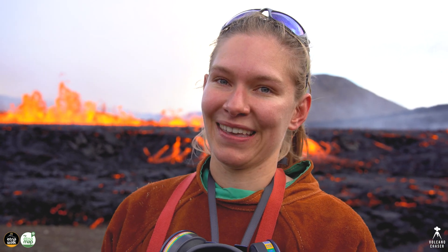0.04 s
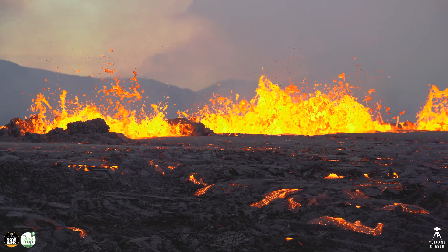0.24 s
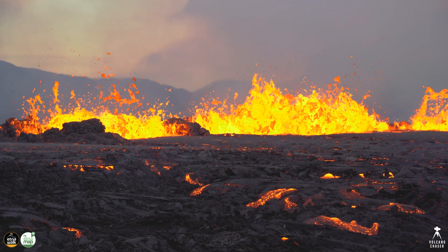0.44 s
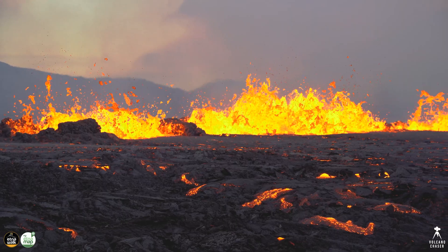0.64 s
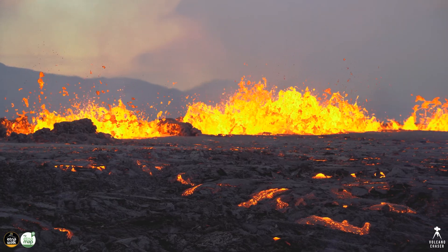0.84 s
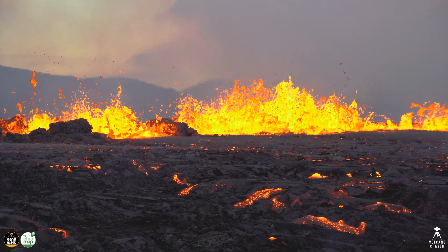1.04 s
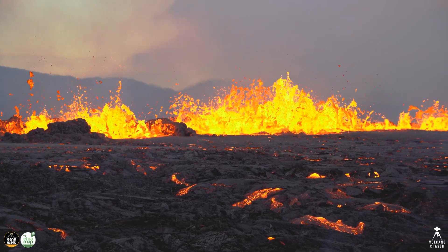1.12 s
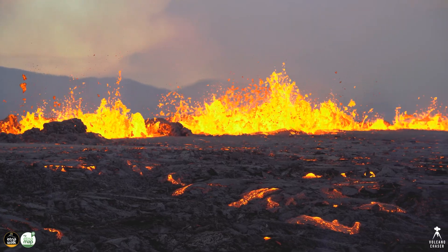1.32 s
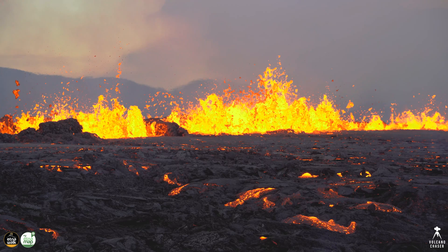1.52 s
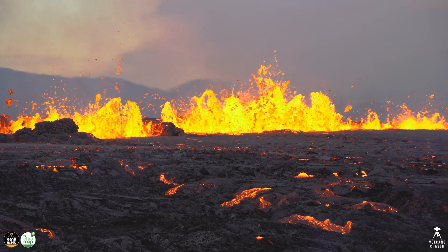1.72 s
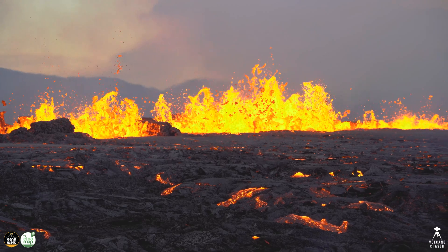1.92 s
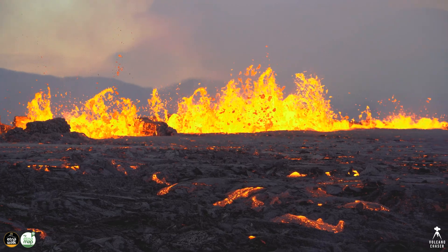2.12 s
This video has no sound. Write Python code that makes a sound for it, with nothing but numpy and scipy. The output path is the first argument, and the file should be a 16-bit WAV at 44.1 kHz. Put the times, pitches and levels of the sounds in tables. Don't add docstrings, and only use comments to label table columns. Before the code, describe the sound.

Lava fountains rumble continuously outdoors, deep gas bursts thudding through hissing spurts and small bubble pops; a wind gust and sharp crust ticks on the right open it, then light breeze brushes the stereo microphone.

```python
import sys
import numpy as np
from scipy import signal
from scipy.fft import rfft, irfft, next_fast_len
from scipy.io import wavfile
from scipy.ndimage import uniform_filter1d, map_coordinates

SR = 44100
rng = np.random.default_rng(int(sys.argv[2]) if len(sys.argv) > 2 else 0)


def makeup_ratio(level_db):
    decades = np.asarray(level_db, float) / 20
    return 10 ** decades


def unload_wav(signal):
    wavfile.write(
        sys.argv[1],
        SR,
        np.round(np.clip(np.atleast_2d(signal).T, -1, 1) * 32767).astype(np.int16),
    )


N = 95388

# time in seconds, level in dB.
ROAR_DB = [(0.0, -29), (0.08, -27.5), (0.38, -23), (0.74, -23), (0.86, -19.5), (1.05, -23.5), (1.24, -23),
           (1.4, -20), (1.67, -23.5), (1.83, -23.5), (2.16, -23)]
# frequency in Hz, density in dB per Hz.
ROAR_SPECTRUM = [(12, -45), (20, -5.5), (59, -3.5), (120, -0.5), (187, -7.5), (290, -21.5), (344, -24.5),
                 (464, -35.5), (600, -45.5), (780, -61), (1320, -120)]
# centre in seconds, pitch in Hz, level in dB, length in cycles.
SLUGS = [(0.099, 121, -19, 2.4), (0.215, 57, -15, 0.86), (0.319, 60, -14, 2.8), (.377, 125, -9.5, 3.1),
         (.36, 193, -19.5, 5.5), (.405, 192.4, -16, 5.4), (0.441, 171, -20, 6.1), (.69, 110, -15, 4.1),
         (0.784, 59, -11.5, 3), (0.812, 128, -14, 2.7), (.905, 179, -11, 2.4), (.912, 242, -13, 4),
         (0.908, 342, -22, 4.7), (0.919, 64, -18, 2.6), (0.964, 183, -18.5, 3.8), (1.009, 152, -18.5, 1.4),
         (1.171, 102.7, -10, 1.83), (1.442, 98, -1, 1.2), (1.472, 105, -7, 1.13), (1.565, 105, -14, 4.2),
         (1.609, 74, -9.5, 1.2), (1.742, 57.4, -8.5, 1.8), (1.776, 226, -18.5, 2.7), (1.8, 128, -11.5, 4.3),
         (1.854, 73.5, -12, 2.1), (1.93, 138, -17, 3.7), (1.998, 67.4, -7.5, 0.86),
         (2.123, 66, -10.5, 1.95), (2.13, 128, -15, 4.6), (0.431, 64, -24, 2.1), (0.491, 53, -16.5, 1.2),
         (0.541, 57.5, -23, 2.4), (.64, 50.7, -19, 1.3), (.72, 93, -11, 2.1), (.755, 154, -14, 2.5),
         (.93, 88, -23, 3.4), (0.986, 90, -15, 1.5), (1.019, 70.4, -15, 1.3), (1.05, 103, -22, 2.7),
         (1.12, 71, -16.5, 2.3), (1.125, 157, -17.5, 2.5), (1.22, 61, -14, 1.6), (1.311, 55, -16.5, 1.8),
         (1.585, 62, -13, 2.2), (1.64, 46, -19, 1.8), (1.785, 55, -23, 1.4), (1.911, 65, -15, 1.5),
         (2.019, 253, -27, 4.3), (2.049, 72, -15, 1.7), (.35, 332, -26.5, 3.6)]
# peak in seconds, rise from -10 dB in seconds, fall to -10 dB in seconds.
SPURTS = [(.2, .1, .12), (.372, .055, .045), (.44, .07, .115), (.468, .04, .08), (.6, .013, .013),
          (.67, .08, .07), (.82, .03, .08), (.89, .1, .07), (.958, .07, .028), (1.03, .05, .04),
          (1.1, .025, .1), (1.24, .13, .08), (1.357, .035, .045), (1.49, .065, .08), (1.59, .06, .08),
          (1.68, .08, .075), (1.795, .035, .03), (1.835, .015, .025), (1.97, .06, .05), (2.033, .04, .045)]
# hiss in dB, body in dB.
SPURT_DB = [(-49.5, -43.5), (-40.5, -36), (-37.5, -35), (-52, -29.5), (-40, -33.5), (-56, -63), (-49, -35),
            (-42, -32.5), (-36, -33), (-42.5, -37), (-50, -44), (-41.5, -42.5), (-38.5, -52), (-39, -36.5),
            (-42.5, -33), (-41.5, -39), (-41, -62), (-48, -45), (-44.5, -37.5), (-37.5, -34.5)]
SIZZLE_DB = [-64, -45, -43, -60, -46.5, -55, -56, -48, -43, -54, -58, -54, -46.5, -46, -52, -49, -49.5,
             -47.5, -56, -51.5]
# frequency in Hz, density in dB per Hz.
HISS_SPECTRUM = [(1000, -16), (1700, -7.5), (2500, -4.5), (4000, -9), (7500, -15), (11500, -25),
                 (13000, -36), (15800, -52)]
BODY_SPECTRUM = [(170, 8.5), (260, 10), (450, 2.5), (800, 2), (1400, -0.5), (1900, -6.5), (2800, -17)]
SIZZLE_SPECTRUM = [(3500, -3), (5500, 0), (9500, -7), (13000, -26)]
# frequency in Hz, correlation from 0 to 1.
JET_ALIKE = [(400, 0.88), (1200, 0.99), (2500, 0.97), (6200, 0.95), (7500, 0.57), (8800, 0.65),
             (10000, 0.89)]
# time in seconds, level in dB.
GUST_DB = [(0, -25.5), (.03, -23.5), (.1, -27.5), (.2, -35), (.28, -42.5), (.36, -80)]
# frequency in Hz, density in dB per Hz.
GUST_SPECTRUM = [(250, -17), (400, 4), (600, -1), (1100, -3), (1800, -5), (3000, -22.5), (5000, -30),
                 (8000, -39), (16000, -55)]
# frequency in Hz, gain over the right port's spectrum in dB.
GUST_LEFT_DB = [(400, -11), (1500, -9), (3000, -2), (6000, -1), (15000, -1)]
# centre in seconds, pitch in Hz, peak in dB, width in seconds.
LUMPS = [
    (.03, 477, -22, 0.0047),
    (.048, 940, -22, 0.0018),
    (.068, 1530, -27, 0.0037),
    (.102, 575, -23.5, 0.0024),
    (.155, 830, -27, 0.0033),
    (.205, 910, -31, 0.0029),
]
# frequency in Hz, density in dB per Hz.
GUST_TOP_SPECTRUM = [(2500, -14), (4000, -9), (8000, 0), (11000, -4), (16000, -11)]
BREEZE_SPECTRUM = [(200, -21), (350, -14.5), (800, -9.5), (1500, -13), (4000, -24.5), (9000, -24),
                   (11000, -44)]
SELF_NOISE_SPECTRUM = [(9000, -4), (13000, 0), (15900, -6)]
# right-port time in seconds, pitch in Hz, peak in dB, left over right in dB, width in ms.
TICKS = [(.0522, 11500, -31, -7, .12), (.0525, 7000, -36, -4, .25), (.0943, 12500, -11.5, -12, .045),
         (.0948, 6500, -21, -13, .07), (.0985, 11000, -36, -10, .1), (.1043, 10500, -35, -10, .08),
         (.1100, 11000, -35, -10, .2), (.1118, 5000, -30, 0, .15), (.1120, 6200, -22, -9, .17),
         (.1127, 11700, -26, -11, .2), (.1135, 14000, -33, -11, .1), (.186, 15200, -48, -4, .12),
         (.2065, 9500, -42, 0, .06), (.236, 13000, -36, -1, .04), (.245, 15300, -41, -1, .12),
         (.2453, 11000, -43, -1, .06)]
# frequency in Hz, density in dB per Hz.
CRACKLE_SPECTRUM = [(4000, -9), (9000, -2), (11000, 0), (13000, -10), (15500, -5)]
# centre in seconds, pitch in Hz, peak in dB.
POPS = [(.356, 1180, -36), (.418, 2030, -33), (.444, 1390, -33), (0.465, 1050, -27.5), (.468, 572, -27.5),
        (.485, 1380, -32), (.495, 1030, -29), (.512, 762, -30.5), (.528, 480, -33), (.599, 1620, -34),
        (.605, 1280, -33.5), (.82, 700, -33), (.852, 2030, -33), (.876, 830, -28), (.894, 770, -34),
        (.927, 1380, -32), (.963, 3420, -31), (.975, 930, -32), (1.212, 2960, -37), (1.356, 2545, -34),
        (1.355, 3960, -31), (1.551, 886, -35), (1.591, 1290, -38), (1.674, 1470, -32), (2.023, 1390, -36),
        (2.032, 920, -33), (2.039, 1200, -32), (2.046, 1570, -32)]
# centre in seconds, pitch in Hz, peak in dB.
TAPS = [(.77, 600, -37), (1.37, 495, -43), (1.384, 665, -30), (1.44, 600, -26), (1.66, 546, -24),
        (1.675, 600, -29), (1.709, 800, -27), (1.715, 550, -23), (1.752, 696, -25), (1.786, 500, -27),
        (2.07, 600, -26)]
# frequency in Hz, density in dB per Hz.
SPLASH_SPECTRUM = [(2000, -20), (2500, 0), (3250, -12)]


def unit(x):
    return x / np.sqrt(np.mean(x ** 2) + 1e-20)


def along(points, hz, closed=False):
    f, v = np.transpose(points)
    edge = -120 if closed else None
    return np.interp(np.log(hz + 1), np.log(f + 1), v, edge, edge)


def curve(rows):
    s, v = np.transpose(rows)
    return np.interp(np.arange(N) / SR, s, v)


def wobble(rate_hz):
    return map_coordinates(rng.standard_normal(400), [np.arange(N) * rate_hz / SR])


def filtered(x, response):
    m = next_fast_len(N + SR // 2)
    return irfft(rfft(x, m) * response(np.fft.rfftfreq(m, 1 / SR)), m)[..., :N]


def ports(x, left_db, right_db):
    return x * makeup_ratio([[left_db], [right_db]])


def rush(spectrum, alike, patchy_db):
    z = signal.stft(rng.standard_normal((2, N)), nperseg=512)[2]
    field = rng.standard_normal(z.shape[1:])
    for axis in (0, 1):
        field = uniform_filter1d(field, size=8, axis=axis)
    pair = signal.istft(z * makeup_ratio(patchy_db * unit(field)), nperseg=512)[1][:, :N]

    def mid_side(hz):
        turn = np.arccos(np.clip(along(alike, hz), -1, 1)) / 2
        return makeup_ratio(along(spectrum, hz, True)) * [np.cos(turn), np.sin(turn)]

    mid, side = filtered(pair, mid_side)
    return unit(np.array([mid + side, mid - side]))


def blip(at_s, hz, db, width_s, glide=0.):
    t = np.arange(N) / SR - at_s
    u = np.clip(t / width_s, -6, 6)
    return makeup_ratio(db) * np.exp(-.5 * u ** 2) * np.cos(2 * np.pi * hz * t * (1 + .5 * glide * u))


def rumble():
    roar_db = curve(ROAR_DB) + 2.36 + 0.9 * wobble(12.05)
    roar = makeup_ratio(roar_db) * rush(ROAR_SPECTRUM, [(100, 0.97)], patchy_db=-0.36)
    slugs = sum(blip(s, hz, db, cycles / hz / 2, glide=0.08) for s, hz, db, cycles in SLUGS)
    return ports(roar + slugs, 1.75, -1.75)


def jets():
    t = np.arange(N) / SR
    hiss, body, sizzle = makeup_ratio(-47.5) ** 2, makeup_ratio(-39.5) ** 2, 0
    for (s, rise_s, fall_s), (hiss_db, body_db), sizzle_db in zip(SPURTS, SPURT_DB, SIZZLE_DB):
        shape_db = -10 * np.where(t < s, (s - t) / rise_s, (t - s) / fall_s) ** 1.4
        hiss = hiss + makeup_ratio(hiss_db + shape_db) ** 2
        body = body + makeup_ratio(body_db + shape_db) ** 2
        sizzle = sizzle + makeup_ratio(sizzle_db + shape_db) ** 2
    flutter_db = wobble(44.36)
    treble_gain = makeup_ratio(0.5 * flutter_db)
    body_gain = makeup_ratio(0.58 * flutter_db + 0.61 * wobble(60.5))
    return (np.sqrt(hiss) * treble_gain * rush(HISS_SPECTRUM, JET_ALIKE, patchy_db=1.0)
            + np.sqrt(body) * body_gain * rush(BODY_SPECTRUM, JET_ALIKE, patchy_db=0.3)
            + np.sqrt(sizzle) * treble_gain * rush(SIZZLE_SPECTRUM, JET_ALIKE, patchy_db=3.0))


def gust():
    left, right = rush(GUST_SPECTRUM, [(500, 0.049)], patchy_db=0.5)
    left = filtered(left, lambda hz: makeup_ratio(along(GUST_LEFT_DB, hz)))
    tumble_db = 1.2 * np.array([wobble(76), wobble(69.0)])
    return makeup_ratio(curve(GUST_DB) + tumble_db) * [left, right]


def gust_top():
    top = makeup_ratio(-38.5 + 0.59 * curve(GUST_DB)) * rush(GUST_TOP_SPECTRUM, [(500, 0.24)], patchy_db=0.7)
    return ports(top, -2.5, 0)


def gust_lumps():
    return ports(sum(blip(*lump) for lump in LUMPS), -13, 0)


def breeze():
    lumps_db = 3.5 * np.array([wobble(25.1), wobble(24.85)])
    return ports(makeup_ratio(-49 + lumps_db) * rush(BREEZE_SPECTRUM, [(500, 0.044)], patchy_db=1.5), 0, -5)


def self_noise():
    return makeup_ratio(-73) * rush(SELF_NOISE_SPECTRUM, [(500, 0.6)], patchy_db=1)


def crust_ticks():
    lag_s = 0.0005
    left = sum(blip(s + lag_s, hz, db + left_db, ms / 1000) for s, hz, db, left_db, ms in TICKS)
    right = sum(blip(s, hz, db, ms / 1000) for s, hz, db, _, ms in TICKS)
    return np.array([left, right])


def crust_crackle():
    noise = rush(CRACKLE_SPECTRUM, [(500, .3)], patchy_db=0.7)
    return ports(noise * blip(.1105, 0, -39, width_s=.0024), -11, 0)


def bubble_pops():
    return sum(blip(s, hz, db, 2.6 / hz, glide=-.03) for s, hz, db in POPS)


def eddy_taps():
    return ports(sum(blip(s, hz, db, width_s=0.0011) for s, hz, db in TAPS), 0, -14)


def splash():
    noise = rush(SPLASH_SPECTRUM, [(500, .9)], patchy_db=.1)
    return ports(noise * blip(1.7, 0, -49, width_s=0.016), -5, 0)


def scene():
    lava = rumble() + jets() + bubble_pops() + splash()
    wind = gust() + gust_top() + gust_lumps() + breeze() + eddy_taps()
    crust = crust_ticks() + crust_crackle()
    return filtered(lava + wind + crust + self_noise(), lambda hz: hz < 15900)


def low_pass(x):
    return signal.sosfilt(signal.butter(12, 15900, fs=SR, output="sos"), x)


def record(dry):
    mix = dry / (1 + np.abs(dry) ** 8) ** (1 / 8)
    return low_pass(mix)


dry = scene()
out = record(dry)
unload_wav(out)
```